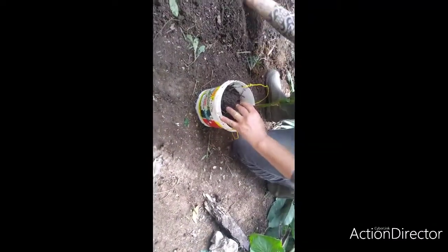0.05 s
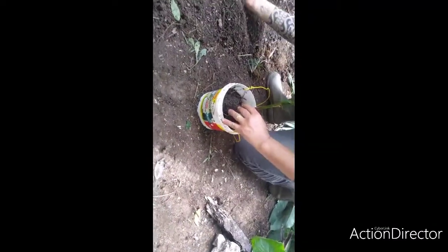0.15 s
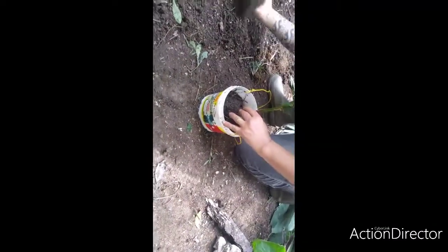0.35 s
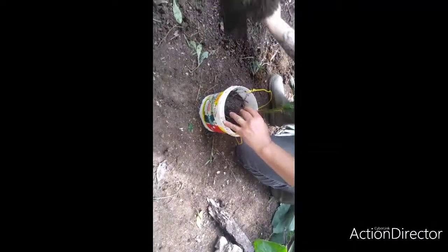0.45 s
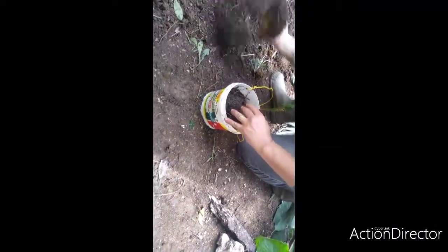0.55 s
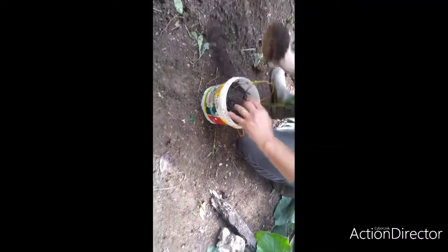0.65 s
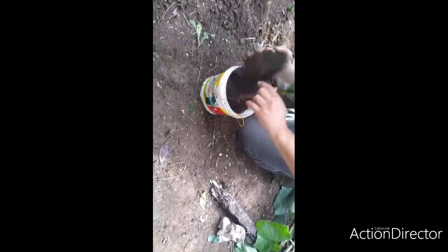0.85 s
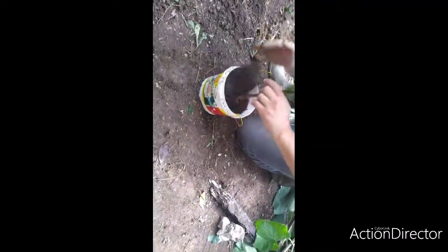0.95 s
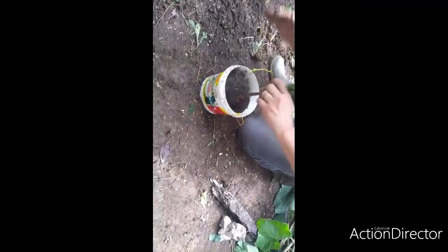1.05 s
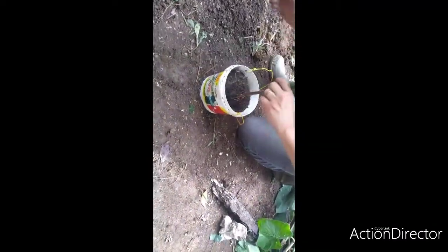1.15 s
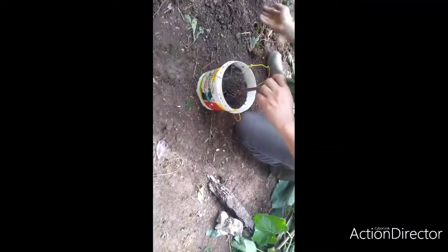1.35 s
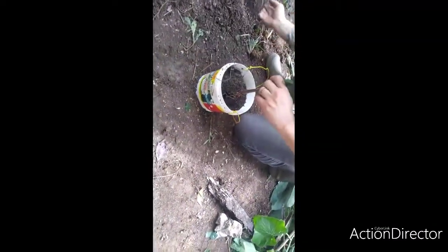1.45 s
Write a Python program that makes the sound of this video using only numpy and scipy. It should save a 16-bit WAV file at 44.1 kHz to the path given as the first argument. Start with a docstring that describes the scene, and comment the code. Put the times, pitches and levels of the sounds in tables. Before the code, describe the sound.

Loose soil tipped into a small plastic bucket, after three sharp close clicks.

```python
"""Three sharp clicks, close to the microphone, cut through the soft hiss and rumble of still outdoor air
and make the limiter duck the background. Then a scoop of loose soil is lifted and tipped into a bucket:
fine grit trickles, coarse soil slides, clods crunch, and soft bumps ring the bucket's low modes.
The left channel is slightly late and of opposite polarity."""
import sys
import numpy as np
from scipy import signal
from scipy.fft import rfft, irfft
from scipy.io import wavfile
from scipy.ndimage import uniform_filter1d, minimum_filter1d

SR = 44100
rng = np.random.default_rng(int(sys.argv[2]) if len(sys.argv) > 2 else 0)


def persist_wave(psi):
    """Save psi, clipped to +-1, as 16-bit WAV."""
    counts = np.round(np.clip(psi, -1, 1) * 32767).astype(np.int16)
    wavfile.write(sys.argv[1], SR, np.atleast_2d(counts).T)


N = 66150
T = np.arange(N) / SR
HZ = np.maximum(np.arange(N // 2 + 1) * SR / N, 1)

# how alike the soil sounds on the two sides of the microphone: f/Hz, left-right likeness
SOIL_LIKENESS = [(500, 1), (1500, .6), (2200, 1), (2800, 0.44), (4100, .95), (7000, .5), (12000, .1)]


def from_db(db):
    """Decibels to gain."""
    return 10 ** (np.asarray(db) / 20)


def rms_one(x):
    """Scale to unit power."""
    return x / np.sqrt(np.mean(x ** 2) + 1e-20)


def level(rows):
    """Gain over time from points of t/s, level/dB; silent before the first."""
    times, db = np.transpose(rows)
    return (T >= times[0]) * from_db(np.interp(T, times, db))


def over_hz(points):
    """Join points of f/Hz, value on a log-frequency axis."""
    hz, value = np.transpose(points)
    return np.interp(np.log(HZ), np.log(hz), value)


def resonance(x, hz, width_hz):
    """Two-pole resonance with gain 1 at its peak."""
    r = np.exp(-np.pi * width_hz / SR)
    feedback = [1, -2 * r * np.cos(2 * np.pi * hz / SR), r * r]
    return signal.lfilter(np.array([1, 0, -1]) * (1 - r * r) / 2, feedback, x + 1e-18)


def burst(start, t60):
    """An envelope that jumps up at the start and falls 60 dB in t60 seconds."""
    return (T >= start) * np.exp(-np.log(1000) * np.maximum(T - start, 0) / t60)


def ring(start, hz, t60):
    """A decaying sine that sets in at the given time."""
    return np.sin(2 * np.pi * hz * (T - start)) * burst(start, t60)


def stereo(pair, colour, likeness):
    """Colour two unrelated signals and blend them into left and right at unit power."""
    mid, side = rfft(pair) * from_db(over_hz(colour))
    alike = np.clip(over_hz(likeness), -1, 1)
    return rms_one(irfft(np.sqrt(1 + alike) * mid + np.sqrt(1 - alike) * side * [[1], [-1]], N))


def grains(per_s, spread_db):
    """Random tiny contacts of uneven size, as two unrelated trains."""
    sizes = from_db(spread_db * np.minimum(rng.exponential(1, N), 5))
    return (rng.random(N) < per_s / SR) * sizes * rng.standard_normal((2, N))


def air():
    """The outdoor background: a soft hiss over a wavering low rumble, both without pause."""
    # spectra of the hiss and the rumble: f/Hz, level/dB
    hiss_colour = [(100, -8), (330, 0.5), (550, 1.5), (950, -1.5), (1200, -6.5), (1600, -8), (2100, -11),
                   (3000, -21), (6000, -22.5), (10000, -29.5), (14000, -36.5)]
    rumble_colour = [(20, -24), (40, -16.5), (65, 4), (92, 2), (130, -2), (180, -2), (260, -9.5),
                     (350, -24.5), (700, -36.5), (2000, -83)]
    # their rise and fall: t/s, level/dB
    hiss_level = [(0, -52.5), (.22, -53), (.3, -51.5), (.65, -51.5), (.8, -58.5), (1.3, -56.5), (1.5, -56)]
    rumble_level = [(0, -46.5), (.2, -48.5), (.3, -48.5), (.38, -44.5), (.5, -48.5), (.63, -46), (.74, -53),
                    (.95, -53.5), (1.12, -49.5), (1.28, -52.5), (1.42, -48.5), (1.49, -47)]
    # their spread across the microphone: f/Hz, left-right likeness
    hiss_likeness = [(300, 0.47), (1000, 1), (2050, 1), (4100, 1), (7000, .6), (12000, .2)]
    rumble_likeness = [(40, 0.93), (95, 0.12), (250, 0.2)]
    hiss = level(hiss_level) * stereo(rng.standard_normal((2, N)), hiss_colour, hiss_likeness)
    rumble = level(rumble_level) * stereo(rng.standard_normal((2, N)), rumble_colour, rumble_likeness)
    return hiss + rumble


def clicks():
    """Close clicks: each a pressure spike with dead resonances, a snap, a low ring and a gritty tail."""
    # pressure spikes: t/s, level/dB, half-width/ms, low ring/dB, snap/dB (both relative to the spike)
    strikes = [(0.2435, 14.6, .071, -47, -41), (0.4582, 7.7, .096, -39, -48),
               (0.6675, 14.6, .073, -40, -43)]
    # heavily damped resonances: f/Hz, width/Hz, level/dB
    modes = [(1240, 790, -4), (2685, 2100, -1), (8100, 5000, 0)]
    # spectrum of the snap and the tail: f/Hz, level/dB
    tail_colour = [(500, 8), (1200, 4), (2100, 2.5), (3200, 1.5), (4300, -4), (7500, -18), (10000, -20),
                   (14000, -48)]
    tail_db, left_db, low_cut_hz = -30.5, -2.9, 163
    spikes, low_ring, tail_envelope = np.zeros((3, N))
    for start, db, width_ms, ring_db, snap_db in strikes:
        widths_from_peak = np.clip((T - start) * 1000 / width_ms, -40, 40)
        spikes -= from_db(db) / np.cosh(widths_from_peak)
        low_ring -= from_db(db + ring_db) * ring(start, hz=58.7, t60=0.13)
        snap = from_db(db + snap_db) * burst(start, t60=0.0041)
        tail_envelope += snap + from_db(tail_db) * burst(start, t60=0.056)
    body = sum(from_db(db) * resonance(spikes, hz, width) for hz, width, db in modes)
    low_cut = signal.butter(2, low_cut_hz, "high", fs=SR, output="sos")
    knock = signal.sosfilt(low_cut, 0.5 * (spikes + body))
    tail = tail_envelope * stereo(rng.standard_normal((2, N)), tail_colour, SOIL_LIKENESS)
    return (knock + low_ring + tail) * from_db([[left_db], [0]])


def grit():
    """Fine dry grains slide and trickle with a bright, sandy hiss."""
    # flow of the grit: t/s, level/dB
    trickle = [(.49, -77), (.58, -60), (.66, -59), (.73, -66), (.80, -54), (.84, -76), (.88, -67.5),
               (.91, -72), (.96, -62), (1.01, -57.5), (1.10, -60), (1.17, -66.5), (1.27, -76),
               (1.44, -73.5), (1.5, -59)]
    # spectrum of the fine grains: f/Hz, level/dB
    colour = [(1000, -26.5), (3000, 0.5), (5500, 1), (8500, -3), (11000, -7), (14000, -18.5)]
    return level(trickle) * stereo(grains(per_s=5500, spread_db=3), colour, SOIL_LIKENESS)


def crumbs():
    """Coarse soil slides and clods break in pitched bursts; the microphone ports ring near 2 kHz."""
    # coarse soil sliding and rustling: t/s, level/dB
    sliding = [(.73, -55), (.79, -51.5), (.86, -53), (.92, -59), (.96, -51), (1.05, -47.5), (1.12, -55),
               (1.20, -62.5), (1.27, -69)]
    # spectrum of the coarse grains: f/Hz, level/dB
    colour = [(200, -11), (600, 1.5), (1000, 2), (2200, 2), (3200, -6), (4200, -11.5), (6000, -8.5),
              (9000, -18.5), (14000, -23)]
    # clods giving way: t/s, level/dB, decay/s (to fall 20 dB), f/Hz
    crunches = [(0.7566, -32, .008, 2540), (0.7666, -31.5, 0.026, 1510), (0.7801, -32.5, 0.0085, 1850),
                (0.813, -39, 0.011, 9900), (0.885, -53, 0.011, 1600), (.897, -47, 0.014, 4800),
                (0.906, -39, 0.016, 4630), (0.922, -36, 0.014, 1210), (1.002, -40.5, 0.049, 1850),
                (1.031, -38.5, 0.021, 2310), (1.0405, -38, 0.025, 1670), (1.047, -37, 0.0089, 1520),
                (1.115, -42.5, 0.013, 5660), (1.139, -43, 0.031, 2530), (1.1766, -36.5, 0.012, 2470),
                (1.219, -49, .008, 8900)]
    # resonances of the microphone ports, different on each side: f/Hz, width/Hz, left/dB, right/dB
    port_modes = [(1583, 120, 2, -4.5), (2037, 160, 4.5, 3.5), (2765, 94, -19, 4.5)]
    attack_s, crumb_q, ring_db = 0.00053, 4, 6.5
    soil = level(sliding) * stereo(grains(per_s=4600, spread_db=1.5), colour, SOIL_LIKENESS)
    breaking = stereo(grains(per_s=7000, spread_db=1.5), colour, SOIL_LIKENESS)
    for start, db, decay_s, hz in crunches:
        age = np.maximum(T - start, 0)
        envelope = from_db(db) * np.minimum(age / attack_s, 1) * np.exp(-np.log(10) * age / decay_s)
        ringing = from_db(ring_db) * resonance(breaking, hz, hz / crumb_q)
        soil += envelope * rms_one(breaking + ringing)
    port_ring = sum(from_db([[left], [right]]) * resonance(soil, hz, width)
                    for hz, width, left, right in port_modes)
    return 0.5 * (soil + port_ring)


def bucket():
    """Bumps ring the bucket's low modes, damped by the soil inside."""
    # soft bumps: t/s, level/dB
    bumps = [(0.85, -36), (1.067, -35), (1.095, -38.5), (1.163, -34.5)]
    # modes of the filled bucket: f/Hz, level/dB, t60/s
    modes = [(133, -2, 0.03), (231, 0, 0.018), (423, -5, .015), (710, -15, 0.0055)]
    return sum(from_db(db + mode_db) * ring(start, hz, t60)
               for start, db in bumps for hz, mode_db, t60 in modes)


def scene():
    """Everything that reaches the microphone."""
    return air() + clicks() + grit() + crumbs() + bucket()


def limiter(x, limit_db=-0.84, release_db_per_s=4.8, lookahead_s=0.0018):
    """Gain drops on both channels just ahead of a peak and recovers very slowly."""
    peak_db = 20 * np.log10(np.abs(x).max(axis=0) + 1e-9)
    over_db = np.maximum(peak_db - limit_db, 0)
    held_db = np.maximum.accumulate(over_db + release_db_per_s * T) - release_db_per_s * T
    ahead = int(lookahead_s * SR)
    early_gain_db = minimum_filter1d(-held_db, 2 * ahead + 1)
    return x * from_db(uniform_filter1d(early_gain_db, ahead))


def record(dry):
    """The left channel is inverted, late and brighter; then the limiter, a faint hiss and a top cut."""
    # response of the left channel: f/Hz, level/dB
    left_colour = [(100, -1), (1000, 0), (7000, 0), (11000, 3.5), (14000, 3.5)]
    # spectrum of the recorder's own hiss: f/Hz, level/dB
    hiss_colour = [(100, 3), (3000, 6), (7000, -4.5), (14000, -4)]
    left_lag_ms, hiss_db, cutoff_hz = 0.489, -78.5, 14500
    delay = np.exp(-2j * np.pi * HZ * left_lag_ms / 1000)
    left = -irfft(rfft(dry[0]) * delay * from_db(over_hz(left_colour)), N)
    limited = limiter(np.array([left, dry[1]]))
    hiss_spectrum = rfft(rng.standard_normal((2, N))) * from_db(over_hz(hiss_colour))
    hiss = from_db(hiss_db) * rms_one(irfft(hiss_spectrum, N))
    top_cut = 1 / np.sqrt(1 + (HZ / cutoff_hz) ** 90)
    return irfft(rfft(limited + hiss) * top_cut, N)


dry = scene()
out = record(dry)
persist_wave(out)
```